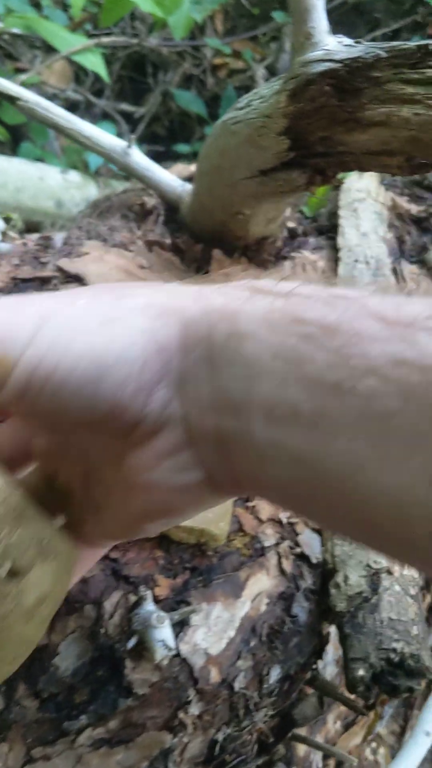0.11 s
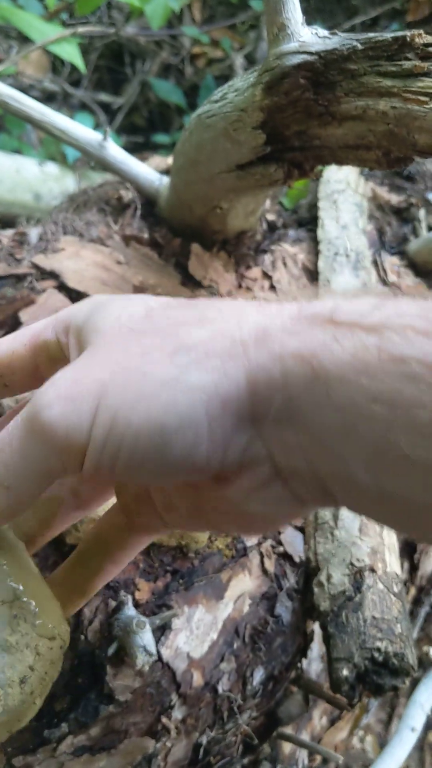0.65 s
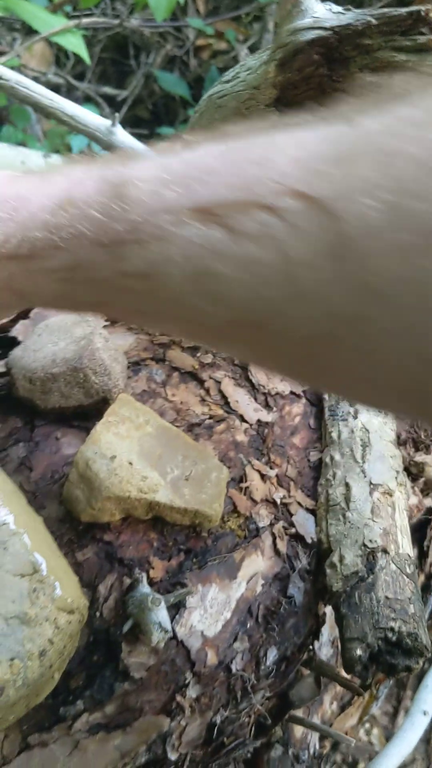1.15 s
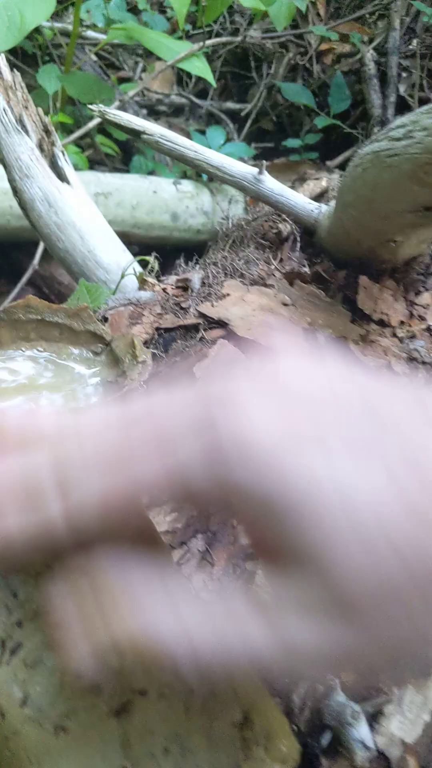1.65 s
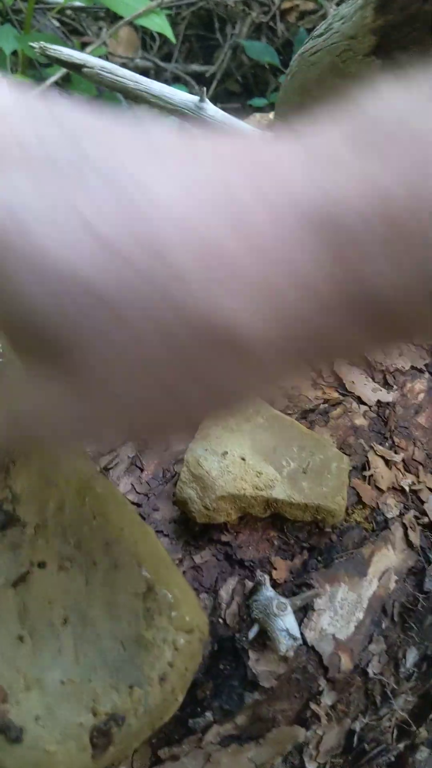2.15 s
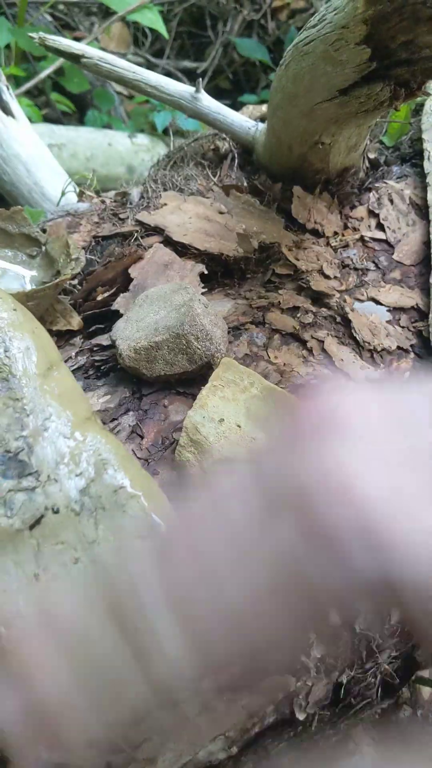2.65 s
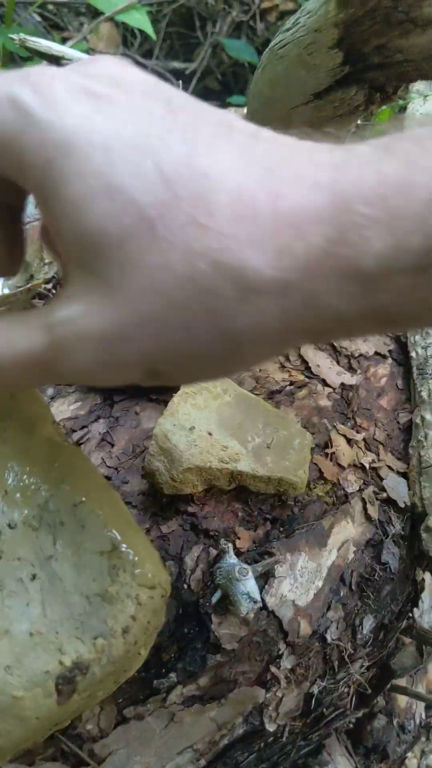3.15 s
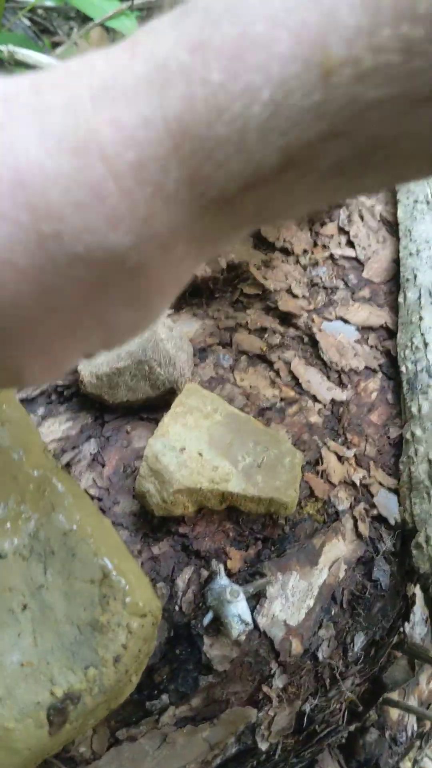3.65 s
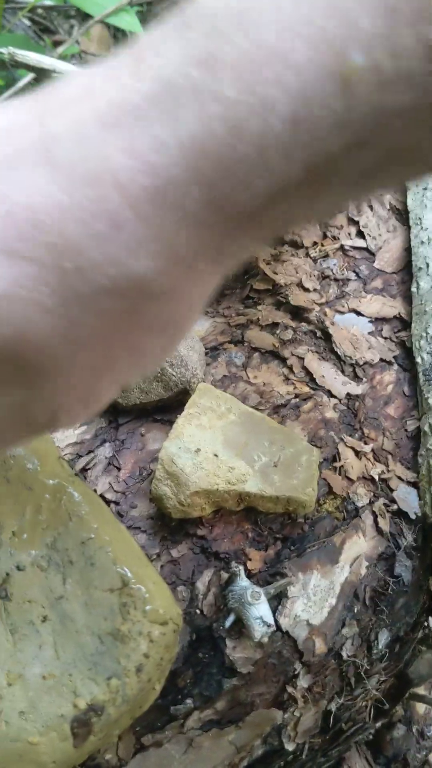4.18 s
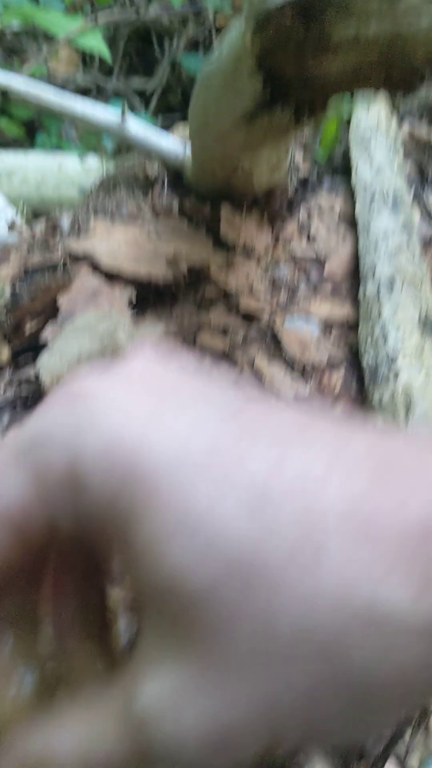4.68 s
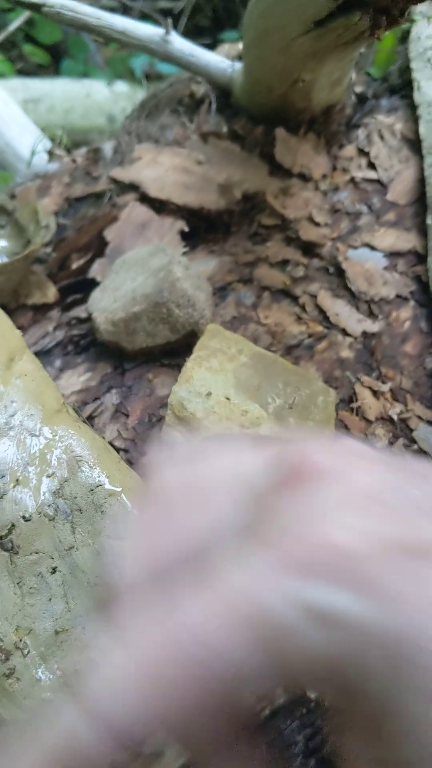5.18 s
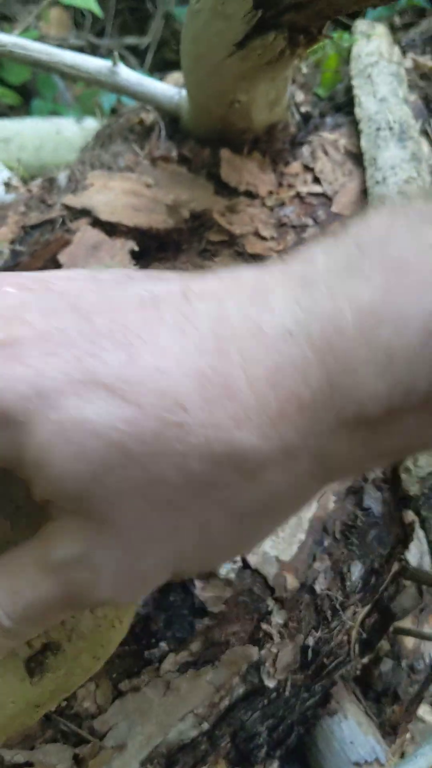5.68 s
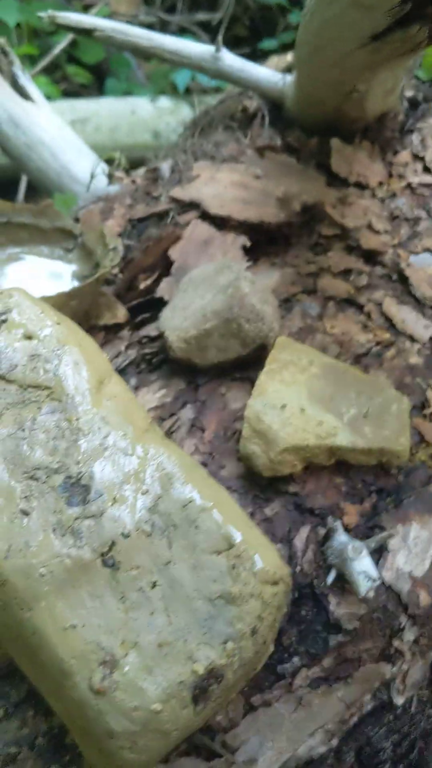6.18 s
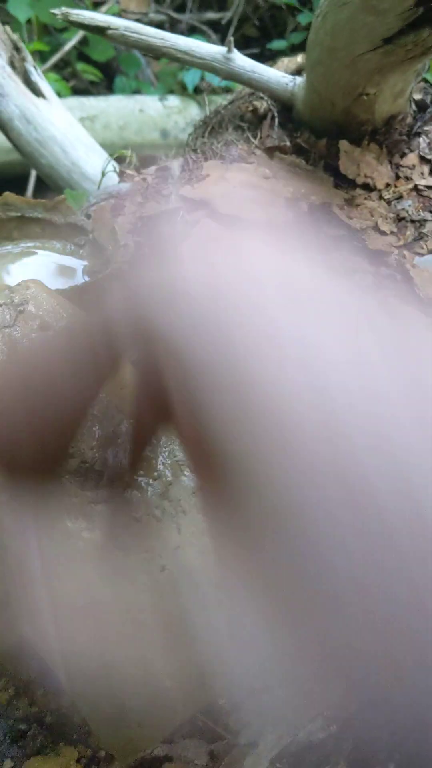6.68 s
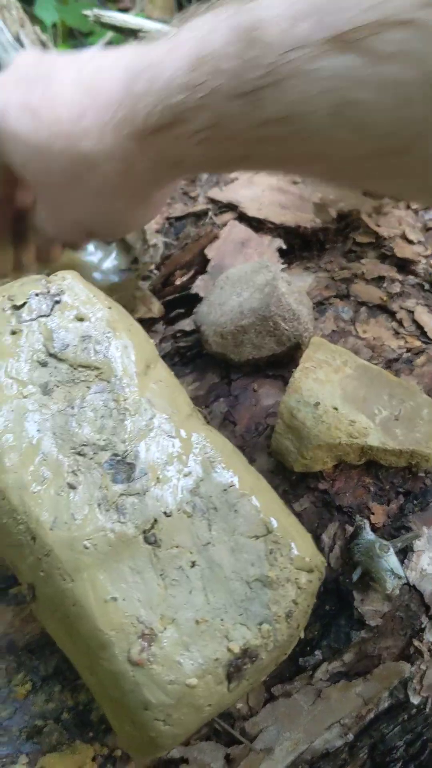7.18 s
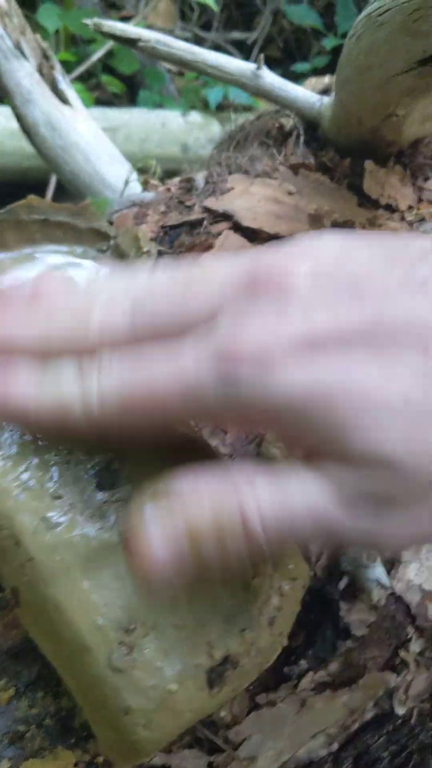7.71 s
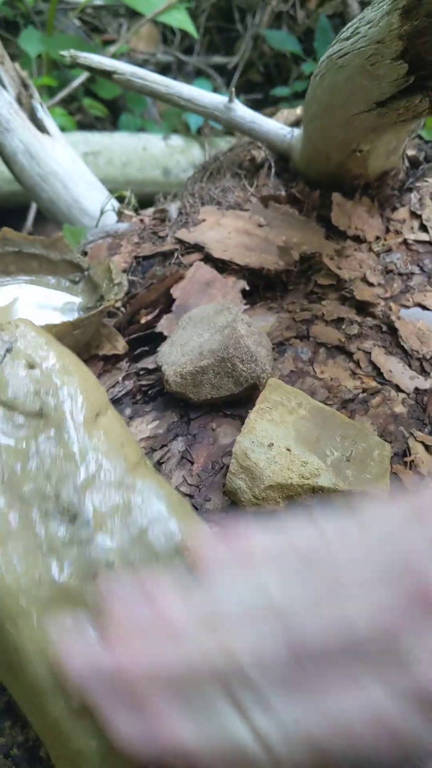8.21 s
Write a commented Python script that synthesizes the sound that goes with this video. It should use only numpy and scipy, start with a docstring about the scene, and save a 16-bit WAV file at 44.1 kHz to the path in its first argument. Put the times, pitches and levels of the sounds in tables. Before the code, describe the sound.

Crickets trill in a shrill, steady pulsing chorus in a wood while a hand makes small sharp clicks and brief scrapes on wet stones.

```python
"""Crickets trill first and throughout: four near ones, scraped tones partly echoed off trees, over a blurred chorus.
The place is a wood, with two microphones of a phone propped near the ground.
Close by, a hand on wet stones makes clicks (decaying knocks and fizz) and scrapes (ringing grains).
Far birds whistle, burr and seep (trembling tones); behind them a far engine drones (multiples of its firing tone)
over steady hums, and the wood rustles and rumbles (shaped noise)."""
import sys
import numpy as np
from scipy import signal
from scipy.fft import rfft, irfft
from scipy.io import wavfile
from scipy.ndimage import uniform_filter1d, map_coordinates

SR = 44100
rng = np.random.default_rng(int(sys.argv[2]) if len(sys.argv) > 2 else 0)


def how_loud(loudness_db):
    """Turn decibels into a plain amplitude multiplier (0 dB gives 1, 20 dB gives 10)."""
    steps = np.asarray(loudness_db, float) / 20
    return 10 ** steps


def log_audio(samples):
    """Write samples as a 16-bit WAV file to the path given in sys.argv[1]."""
    # one column per channel
    frames = np.atleast_2d(samples).T
    # limit to full scale, then quantise
    limited = np.clip(frames, -1, 1)
    pcm = np.round(limited * 32767).astype(np.int16)
    wavfile.write(sys.argv[1], SR, pcm)


N = 367353
T = np.arange(N) / SR


def curve(table):
    """Columns of a table, interpolated along time from its first column."""
    s, *columns = np.transpose(table)
    return [np.interp(T, s, column) for column in columns]


def unit(x):
    """Scale to rms 1."""
    return x / np.sqrt(np.mean(x ** 2))


def walk(rate):
    """Chance drift: about rate normal draws a second, joined by straight lines."""
    count = int(T[-1] * rate) + 3
    return np.interp(T * rate, np.arange(count), rng.standard_normal(count))


def place(x, pan_db):
    """Share a sound between the microphones, pan_db being left minus right."""
    return x * how_loud(np.array([pan_db / 2, -pan_db / 2]).reshape(2, -1))


def band(x, hz, width_hz):
    """Two-pole resonance of peak gain 1."""
    return signal.lfilter(*signal.iirpeak(hz, hz / width_hz, SR), x)


def trees(x, t60):
    """Scattered echoes off trunks and leaves, unlike at the two microphones, falling 60 dB in t60 seconds."""
    t = T[:SR // 2]
    echo = rng.standard_normal((2, len(t))) * np.exp(-np.log(1000) * t / t60)
    return np.array([signal.fftconvolve(x, e / np.linalg.norm(e))[:N] for e in echo])


def stroke(hz, rate, first, share, fall_hz, tail, octave_db, slip=1.3, uneven_db=1.5):
    """A file scraped once a stroke: a tone that swells, sags in pitch as the wing slows, and stops."""
    beat = rate * (T - first) + 1
    number = beat.astype(int)
    part = np.minimum(beat % 1 / share, 1)  # 0 to 1 through the sounding share
    chance = rng.standard_normal((number.max() + 1, 2))
    swell = np.sin(np.pi * part ** 1.25).clip(0) ** .5
    swell = swell * how_loud(uneven_db * chance[number, 0])
    pitch = hz - fall_hz * part ** tail
    # each stroke catches the teeth at a slightly different place
    phase = 2 * np.pi * np.cumsum(pitch * (part < 1)) / SR + slip * np.cumsum(chance[:, 1])[number]
    tone = unit(swell * np.sin(phase))
    # the octave fades earlier in the stroke than the tone
    octave_swell = swell ** 2 * (1 - part) ** .5 * (1 - part ** 2)
    octave = how_loud(octave_db) * unit(octave_swell * np.sin(2 * phase))
    return tone, octave


def low_cricket():
    """Pitch and on-off of the cricket that rests, sounds briefly, then starts again flat and warms up to pitch."""
    stop_s, try_s, try_end_s, resume_s = 3.778, 4.423, 4.455, 4.525
    full_hz, flat_hz, warm_s = 6812, 380, .09
    on = (T < stop_s) | ((T > try_s) & (T < try_end_s)) | (T > resume_s)
    cold = (T > stop_s) * np.exp(-np.maximum(T - resume_s, 0) / warm_s)
    hz = full_hz - flat_hz * cold
    return hz, uniform_filter1d(1. * on, size=300)


# wing strokes, a row each for the low, middle, high and slow cricket: [strokes/s, first stroke t/s,
# sounding share of a stroke, pitch fall at its end f/Hz, lateness of the fall as a power,
# octave level/dB re tone (not used for the low cricket), phase slip/rad]
WINGS = [(40.6, -.0025, .58, 650, 7, -22, 1.5), (41.0, -.0045, .5, 200, 5.5, -26, 2.2),
         (41.9, -.0125, .5, 150, 5.5, -30, 2.5), (18.48, -.0135, .29, 260, 1.6, -40, 1.3)]
# each near cricket as the moving arm screens it and its beat drifts:
# [t/s, left level/dB, right level/dB, beat lateness/ms]
LOW_SEAT = [(0, -46.5, -52.5, 1), (0.701, -46.5, -55, 1), (1.3, -48.5, -64, 0), (1.6, -44, -52.5, 0.5),
            (1.9, -51, -60.5, 0), (2.2, -47.5, -57, 1.5), (2.8, -47, -57.5, 1), (3.75, -44.5, -59.5, 2.5),
            (4.501, -54, -55, 0), (4.9, -46.5, -56, 2), (5.2, -46.5, -57, 2.1), (6.1, -47, -54.5, 2),
            (6.7, -51, -55.5, 3), (7.2, -50.5, -56, 2.2), (7.9, -46, -51, 2.6), (8.33, -46.5, -53, 0.5)]
MID_SEAT = [(0, -51.5, -58, .5), (0.401, -50.5, -52.5, 1.86), (1.0, -48, -53, 1.4), (1.3, -54, -51, 0.4),
            (1.9, -44, -75, -.5), (2.2, -55, -52, 0), (3.1, -52, -51.5, -1.02), (3.7, -59.5, -52.5, -1.86),
            (4.3, -54, -57, 0.35), (4.6, -56, -53, 0.17), (5.5, -50.5, -54.5, -.5), (6.099, -54, -56, 0),
            (7.0, -45, -50.5, .3), (7.3, -50.5, -48, -0.23), (7.6, -50, -62, 0.54), (7.9, -48, -55, .5),
            (8.33, -47.5, -50, .5)]
HIGH_SEAT = [(0, -56, -52, -0.5), (1.0, -53, -54, 2), (1.4, -56, -55, 3), (1.6, -67, -78, 4),
             (2.2, -64, -74, 9.5), (2.5, -57, -63, 8.5), (3.4, -55, -62, 7), (4.3, -55.5, -72, 5.5),
             (4.6, -50.5, -63, 4), (4.9, -52.5, -68, 3.5), (5.5, -52, -67, 2.5), (6.1, -53, -52.5, 3.5),
             (7.3, -51.5, -58, 5.5), (8.33, -55, -62, 7)]
SLOW_SEAT = [(0, -53.5, -58, 1.5), (1.5, -52, -53, 0), (1.799, -60, -71.5, 1.5), (3.15, -57, -55, 7.5),
             (3.4, -54, -69, 8), (4.9, -56.5, -76, 8), (5.5, -55, -57, 4), (6.1, -59, -65, -0.5),
             (7.6, -52, -64, 5.5), (8.0, -60, -60, 6.5), (8.33, -64, -66, 7.5)]
# octave of the low cricket at the microphones: [t/s, left level/dB, right level/dB]
LOW_OCTAVE = [(0.0, -71, -81), (0.59, -70, -102), (2.89, -74, -82), (4.84, -96, -70), (5.54, -72, -86),
              (7.84, -85, -65.5), (8.32, -63, -92)]
# the moving arm bends the path to the left microphone:
# [t/s, lateness/samples of the low, middle and high cricket]
LEFT_LATE = [(0, 3, 0, -2.2), (1.0, 3.3, .8, -2.2), (1.4, 3.2, 2.2, -2.2), (2.3, 3.2, 2, .1),
             (3.4, 3.6, 2.7, -.7), (4.9, 4.7, 5, .2), (5.5, 4.6, 5.3, 1.5), (6.0, 6, 4, 1.8),
             (6.7, 4.6, 2.6, 1), (7.2, 3.5, 1.6, .5), (8.33, 4.4, 2.2, .6)]
# echo off the trees relative to the direct sound: [amplitude ratio], one for each near cricket
TREE_SHARE = [0.57, 0.38, 0.25, 0.43]


def crickets():
    """Four near crickets, each a file-and-scraper tone heard directly and through the trees."""
    low_hz, low_on = low_cricket()
    pitches_hz = (low_hz, 7110, 7390, 7310)
    seats = (LOW_SEAT, MID_SEAT, HIGH_SEAT, SLOW_SEAT)
    left_late = curve(LEFT_LATE) + [2]  # samples; steady for the slow cricket
    out = np.zeros((2, N))
    for hz, seat, wings, wet, late in zip(pitches_hz, seats, WINGS, TREE_SHARE, left_late):
        rate, first, *wing = wings
        *ears_db, beat_late_ms = curve(seat)
        tone, octave = stroke(hz + 14 * walk(5), rate, first + beat_late_ms / 1000, *wing)
        if seat is LOW_SEAT:
            # its octave is silent while the pitch is still below 6720 Hz
            octave_on = low_on * (low_hz > 6720)
            out = out + unit(octave) * octave_on * how_loud(np.array(curve(LOW_OCTAVE)))
            tone, octave = tone * low_on, 0
        voice = tone + octave
        left = map_coordinates(voice, [T * SR - late], mode="mirror")
        direct = np.array([left, voice])
        out = out + how_loud(np.array(ears_db)) * (direct + wet * trees(voice, .35))
    return out


# stones and grit under the hand, close to the microphones:
# [t/s, knock level/dB, knock f/Hz, fizz level/dB re knock, left minus right level/dB]
CLICKS = [(0.123, -57, 1463, -8, -9), (0.1615, -58, 2300, -6, 1), (0.437, -60, 1700, -9, 0),
          (0.6579, -54.5, 1460, -11, -2), (0.6657, -66, 1530, 10, -1.5), (1.7807, -48, 3270, -12, -6),
          (1.797, -60, 3270, 10, -3), (1.911, -82, 1680, 28, -16), (1.9814, -54.5, 3230, 4, 1),
          (2.6179, -49.5, 3260, 9, -12), (2.884, -55.5, 3280, 2, -0.5), (2.903, -55, 3400, -6, 3),
          (4.647, -69.5, 3515, 17.5, -14), (4.7267, -47.5, 910, -18, 9), (4.739, -55, 1208, -10, 8),
          (5.1654, -66, 3440, 6, -12), (5.439, -47, 1520, -27, -13), (5.8232, -65, 2945, 7, -0.5),
          (5.8744, -55, 909.4, 2, 9), (7.717, -71, 3300, 15, -9), (7.8982, -57, 3210, -3, -1),
          (8.1543, -57, 3330, -1, 10), (8.185, -66, 3330, 8, -8)]


def clicks():
    """Each click is a short decaying stony knock and a wet fizz of noise high up."""
    out, t = np.zeros((2, N + 2048)), T[:2048]
    for s, db, hz, fizz_db, pan_db in CLICKS:
        grit = rng.standard_normal((2, len(t)))
        ring_s = .0009 * hz / 1000  # a knock rings longer the higher it is
        knock = np.sin(2 * np.pi * hz * t) * np.exp(-t / ring_s)
        knock = knock + .4 * band(grit[0], hz, 900) * np.exp(-t / .007)
        fizz_fall = np.exp(-t / 0.00042) + 0.15 * np.exp(-t / 0.023)
        fizz = 3.3 * band(grit[1], 9500, 5400) * fizz_fall
        i = int(s * SR)
        out[:, i:i + len(t)] += place(how_loud(db) * (knock + how_loud(fizz_db) * fizz), pan_db)
    return out[:, :N]


# gritty slides of stone on stone: [start t/s, end t/s, level/dB, left minus right level/dB]
SCRAPES = [(0.652, 0.68, -66, -1), (1.779, 1.832, -64, -3), (1.976, 1.998, -63, -5), (2.602, 2.679, -63, 0),
           (2.885, 2.969, -59, -3.5), (7.896, 7.93, -60.5, -10)]
# what the slides ring with: [f/Hz, width f/Hz, relative level/dB]
STONE_MODES = [(1780, 300, 21), (3170, 920, 24.6), (9360, 1030, 22.7), (11400, 2500, 4.2)]


def scrapes():
    """Dense grains of uneven size that ring the stone while it slides."""
    out = np.zeros((2, N))
    for start, end, db, pan_db in SCRAPES:
        i, j = int(start * SR), int(end * SR)
        grain_size = how_loud(1.1 * rng.exponential(size=j - i))
        grains = rng.standard_normal((2, j - i)) * grain_size * how_loud(2.1 * walk(120)[i:j])
        ring = sum(how_loud(mode_db) * band(grains, hz, width) for hz, width, mode_db in STONE_MODES)
        swell = signal.windows.tukey(j - i, .4)
        out[:, i:j] += place(how_loud(db) * unit(ring) * swell, pan_db)
    return out


def note(start, length, hz, end_hz, db, rough_hz, pan_db, flutter_db):
    """A thin note that holds, then trails off among the trees, its pitch trembling by its roughness."""
    hold, trail_db = .4, -8  # share of the length held, level after it
    out, i, j = np.zeros(N), int(start * SR), min(int((start + length) * SR), N)
    part = np.linspace(0, 1, j - i)
    glide = (end_hz - hz) * np.minimum(part / hold, 1)
    pitch = hz + glide + rough_hz * walk(400)[i:j]
    fade_db = trail_db * np.clip((part - hold) / .15, 0, 1)
    swell = signal.windows.tukey(j - i, .1) * how_loud(fade_db + flutter_db * walk(60)[i:j])
    out[i:j] = how_loud(db) * swell * np.sin(2 * np.pi * np.cumsum(pitch) / SR)
    return place(out, pan_db)


# clear whistles, far off: [start t/s, length t/s, f/Hz, level/dB, left minus right level/dB]
WHISTLES = [(2.79, 0.56, 2527, -73, -4), (5.83, 0.42, 3225, -73, 8), (5.97, 0.55, 1868, -81, -1),
            (5.95, 0.6, 2790, -81, 0), (4.25, .2, 2490, -81, -4)]
# burry notes, far off: [start t/s, length t/s, start f/Hz, end f/Hz, level/dB, roughness f/Hz]
BURRS = [(2.23, 0.2, 2730, 3200, -76, 110), (2.31, .4, 3200, 3220, -78, 90),
         (2.52, 0.5, 2930, 2850, -77, 60), (2.69, 0.36, 2130, 2130, -78, 80),
         (4.79, 0.5, 3240, 3300, -70, 70), (4.85, .4, 3800, 3810, -80, 50),
         (4.86, .45, 3370, 3390, -74, 50), (7.99, 0.56, 2900, 3300, -73, 190)]
# thin high calls, far off: [start t/s, length t/s, start f/Hz, level/dB]
SEEPS = [(3.44, .16, 8900, -73), (5.22, .13, 8750, -73), (6.012, 0.25, 8660, -70), (6.48, 0.4, 8660, -70),
         (7.582, 0.42, 8650, -67), (8.11, 0.36, 8660, -68)]


def birds():
    """Three kinds of far bird: steady whistles, rough burrs, and seeps that all slide down."""
    whistle_rough_hz, seep_rough_hz, seep_fall_hz, burr_pan_db = 14, 90, 168, -10
    whistles = sum(note(s, length, hz, hz, db, whistle_rough_hz, pan_db, 2.5)
                   for s, length, hz, db, pan_db in WHISTLES)
    burrs = sum(note(*row, burr_pan_db, 3.6) for row in BURRS)
    seeps = sum(note(s, length, hz, hz - seep_fall_hz, db, seep_rough_hz, 0, 5.5)
                for s, length, hz, db in SEEPS)
    return whistles + burrs + seeps


def chorus(count=10):
    """Many far crickets, out of step and blurred by the trees, above the even hiss of a lower kind."""
    each = rng.random((count, 3))
    pitch_hz = np.linspace(7040, 7420, count) + 50 * each[:, 0]
    far = np.zeros(N)
    for hz, (_, pace, offset) in zip(pitch_hz, each):
        tone, octave = stroke(hz, 39.5 + 3 * pace, -offset / 40, .6, 400, 4, -26, slip=3)
        far += how_loud(3.0 * walk(1.5)) * (tone + octave)
    far = place(how_loud(-56.5) * trees(unit(far), 0.19), 2)
    hiss_band = signal.butter(3, (5400, 6300), "band", fs=SR, output="sos")
    lower = signal.sosfilt(hiss_band, rng.standard_normal((2, N)))
    return far + place(how_loud(-67.5) * unit(lower) * how_loud(1.0 * walk(12)), 0.33)


# far engine: [t/s, firing f/Hz, firing tone level/dB, octave level/dB]
ENGINE = [(3.4, 72, -89, -73), (3.8, 73.16, -66, -75.5), (4.42, 77.8, -60, -70), (4.92, 78.9, -60, -75.5),
          (5.17, 78.75, -65, -62.5), (5.4, 80.8, -61, -73), (5.8, 84.1, -61, -70.5), (6.27, 90.9, -60, -89),
          (6.4, 93, -64.5, -78), (6.7, 93.35, -67, -69.5), (7.19, 92.8, -63, -81), (7.7, 93.8, -68.5, -73),
          (8.33, 93.7, -70.5, -80)]
# steady hums: [f/Hz, width f/Hz, level/dB]
HUMS = [(58.34, 1.6, -66.5), (276.1, 3.2, -83.5), (403.7, 7.6, -81.5)]


def drone():
    """A far engine, its firing tone and multiples rising and gathering speed, over narrow-band hums."""
    hz, db, octave_db = curve(ENGINE)
    phase = 2 * np.pi * np.cumsum(hz) / SR
    parts = ((1, db), (1.5, db - 10), (2, octave_db))  # the half multiple makes it lumpy
    engine = sum(how_loud(level_db + 0.72 * walk(2.4)) * np.sin(k * phase) for k, level_db in parts)
    hums = sum(how_loud(level_db) * unit(band(rng.standard_normal(N), f, width)) for f, width, level_db in HUMS)
    return np.sqrt(2) * engine + hums  # the root makes the engine levels rms


# the wood's own noise: [f/Hz, two-sided density level/dB per Hz]
WOOD = [(20, -78), (68, -79.5), (120, -84.5), (300, -92.5), (700, -97.5), (1300, -103.5), (2000, -107.5),
        (3200, -103.5), (4500, -107.5), (7750, -93), (8050, -112), (8500, -119), (9300, -113),
        (10600, -113), (12500, -110), (14200, -106), (16000, -113)]
# its spread over the microphones: [f/Hz, likeness of left and right 0-1, left minus right level/dB]
WIDTH = [(56, 0.97, 1.5), (162, 0.89, 0), (310, 0.02, 4), (676, 0, 5), (1600, 0.24, -3.5),
         (6600, 0.49, -2.5), (8740, 0.27, -14)]


def wood():
    """Rustle and far rumble: noise shaped by frequency, most alike at the two microphones in the deep bass."""
    log_hz = np.log(np.maximum(np.fft.rfftfreq(N, 1 / SR), 1))
    noise_hz, noise_db = np.transpose(WOOD)
    width_hz, likeness, pan = np.transpose(WIDTH)
    db = np.interp(log_hz, np.log(noise_hz), noise_db)
    alike = np.clip(np.interp(log_hz, np.log(width_hz), likeness), -1, 1)
    pan_db = np.interp(log_hz, np.log(width_hz), pan)
    mid, side = (rfft(rng.standard_normal(N) * how_loud(0.54 * walk(0.85))) * how_loud(db) * np.sqrt(SR / 8)
                 for _ in range(2))
    pair = np.sqrt(1 + alike) * mid + np.sqrt(1 - alike) * side * np.array([[1], [-1]])
    return irfft(place(pair, pan_db), N)


def scene():
    """All sources summed at the two microphones, from the nearest to the background."""
    return crickets() + clicks() + scrapes() + birds() + chorus() + drone() + wood()


def roll_off(x):
    """The treble ends steeply here."""
    return signal.sosfilt(signal.butter(12, 15900, fs=SR, output="sos"), x)


def record(dry):
    """The phone stores the sound of its two microphones."""
    return roll_off(dry)


dry = scene()
out = record(dry)
log_audio(out)
```